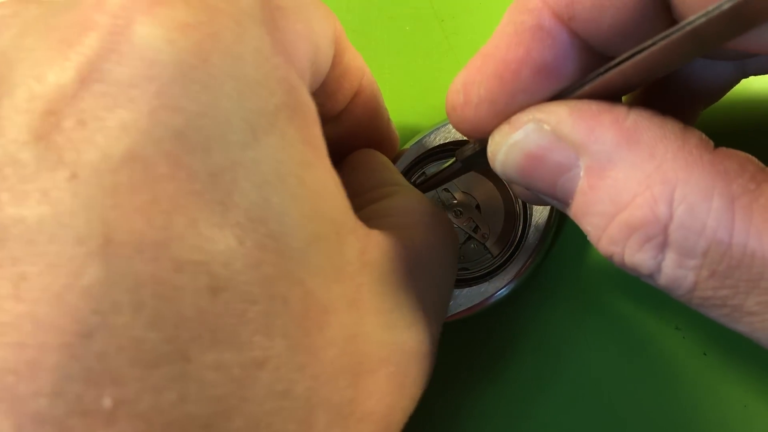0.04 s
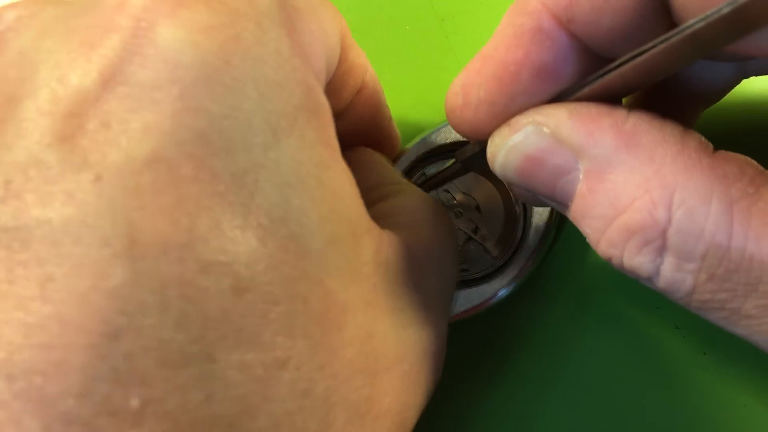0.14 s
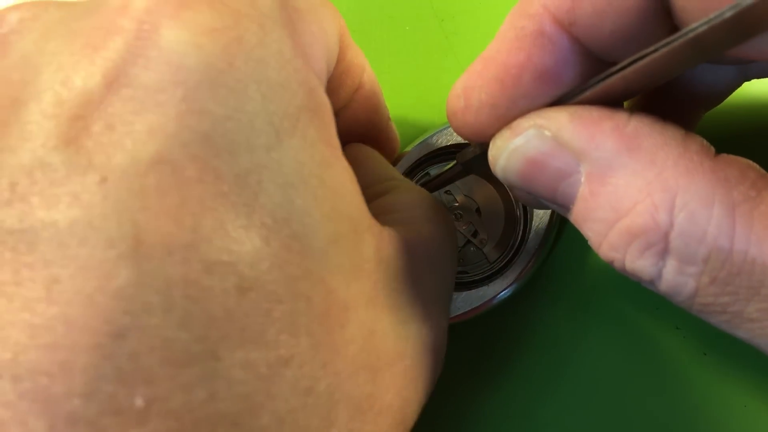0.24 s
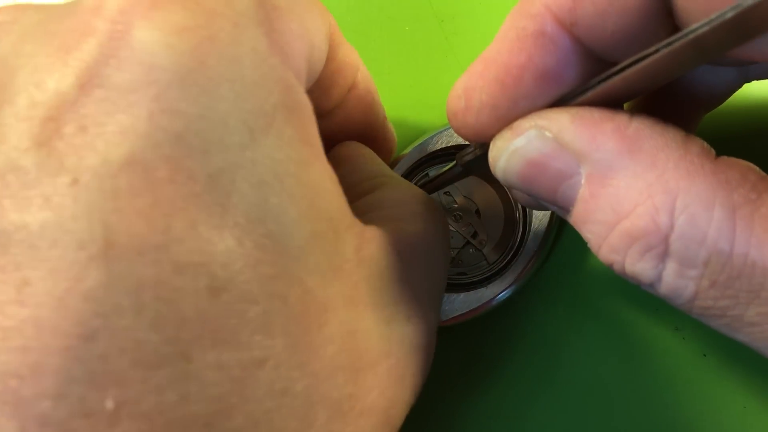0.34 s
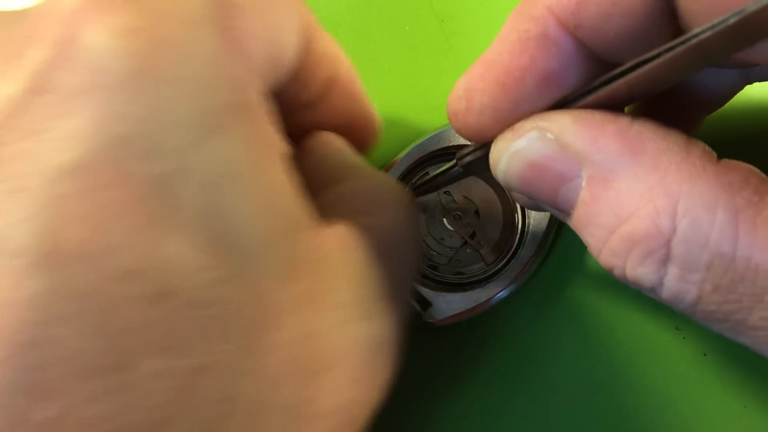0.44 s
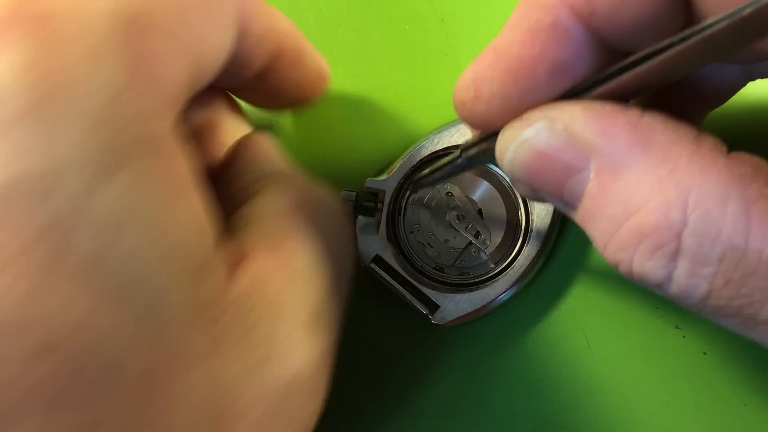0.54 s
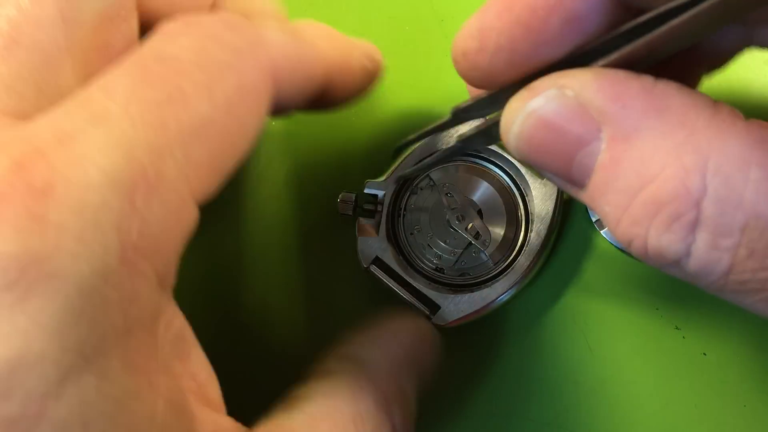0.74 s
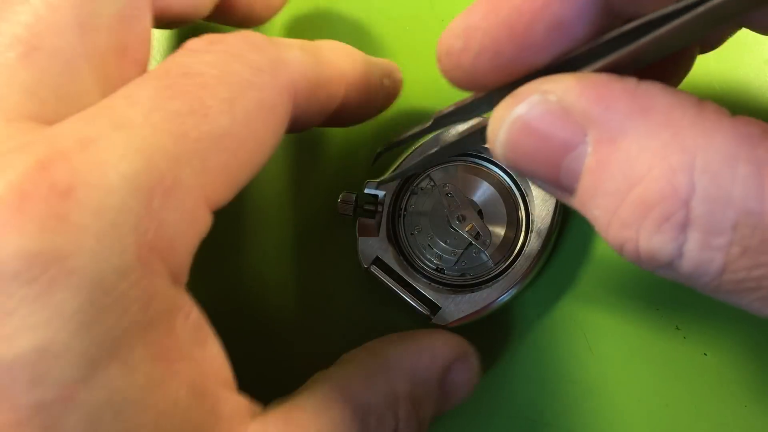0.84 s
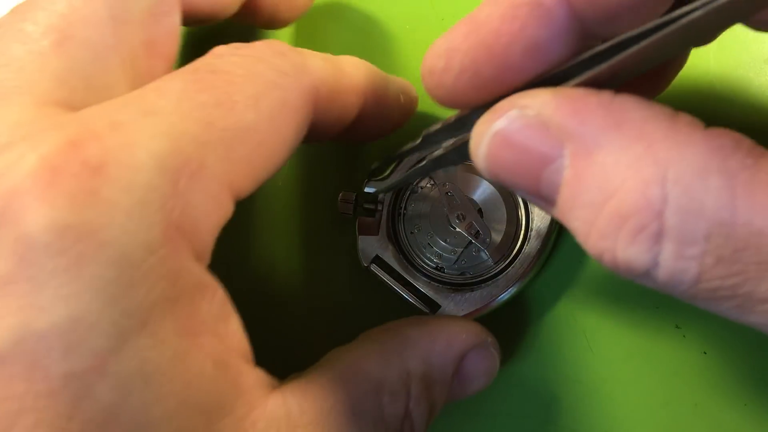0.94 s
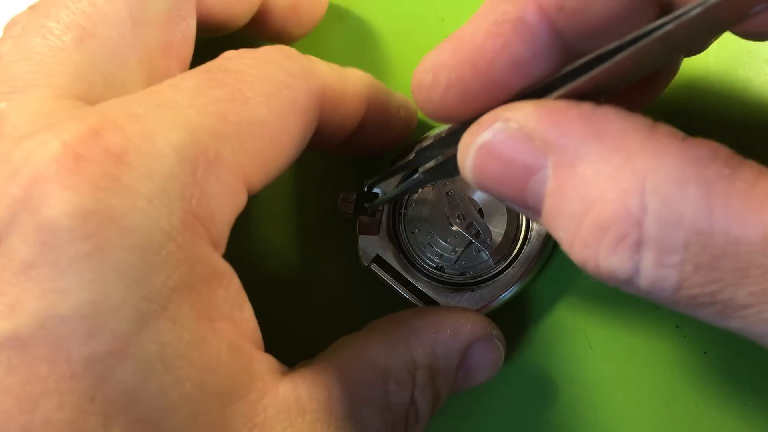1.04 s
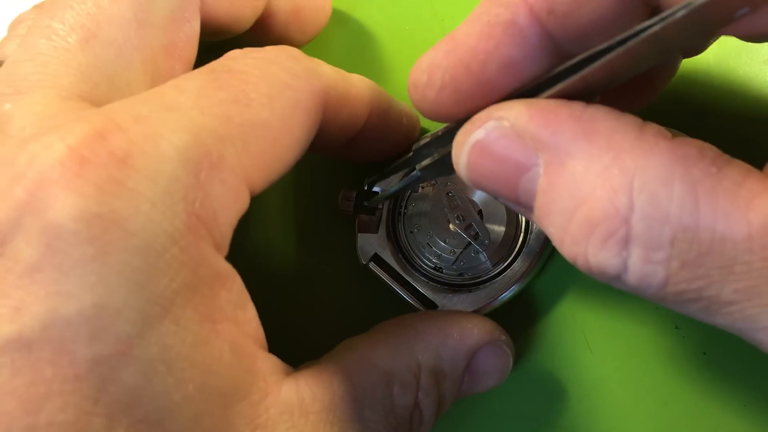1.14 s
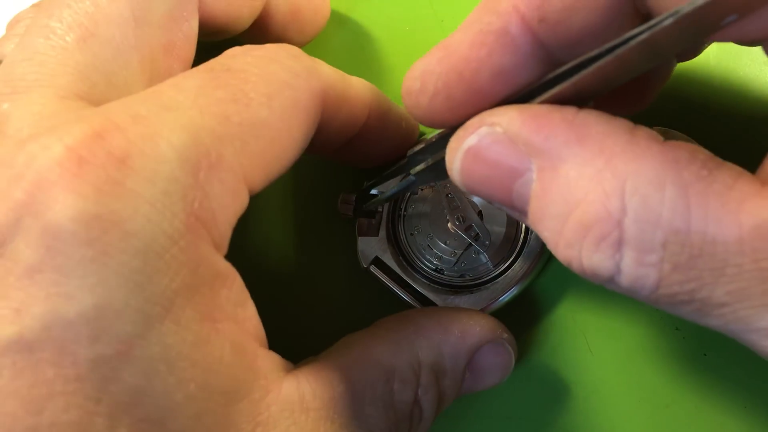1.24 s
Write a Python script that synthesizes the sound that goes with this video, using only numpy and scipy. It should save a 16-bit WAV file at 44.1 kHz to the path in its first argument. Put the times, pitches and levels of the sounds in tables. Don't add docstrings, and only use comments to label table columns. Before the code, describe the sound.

Steel tweezers snap sharply on a metal watch case, which knocks and settles, then a softer tap

```python
import sys
import numpy as np
from scipy import signal
from scipy.io import wavfile
from scipy.ndimage import uniform_filter1d

SR = 44100
rng = np.random.default_rng(int(sys.argv[2]) if len(sys.argv) > 2 else 0)


def ratio_of_db(decibels):
    return 10 ** (np.asarray(decibels, float) / 20)


def pcm_store(signal):
    levels = np.round(np.clip(np.atleast_2d(signal), -1, 1) * 32767)
    wavfile.write(sys.argv[1], SR, levels.astype(np.int16).T)


N = 57330

# start_s, pitch_hz, level_db
RUMBLE_TRACK = [(0.0, 56.5, -76), (0.064, 58.7, -73), (0.136, 60.8, -51.5), (0.234, 55.5, -60),
                (0.282, 62.1, -50), (0.404, 61.7, -62.5), (0.42, 61.1, -86), (0.514, 56.5, -54),
                (0.592, 59.7, -70), (0.648, 57.46, -54), (0.756, 60.1, -63.5), (0.778, 57.1, -77),
                (0.832, 58.2, -49.5), (1.082, 60.16, -65.5), (1.126, 57, -54.5), (1.19, 50.95, -81.5),
                (1.216, 51.6, -54.5), (1.3, 49, -59)]
# freq_hz, density_db
AIR_SPECTRUM = [(12, -78.5), (20, -33), (59, 8.5), (91, -10), (125, -13), (204, -20), (364, -29.5),
                (441, -34.5), (700, -45.5), (910, -65.5), (1540, -120)]
# freq_hz, density_db
CLOSED_HISS_SPECTRUM = [(180, -43), (300, -15.5), (361, -9), (441, -8.5), (717, -18.5), (793, -13),
                        (2570, -19.5), (11400, -31), (16500, -33.5)]
# freq_hz, density_db
OPEN_HISS_SPECTRUM = [(180, -23), (300, 3), (1480, -11.5), (1600, -10.5), (1740, -11.5), (3190, -10.5),
                      (11600, -16), (15400, -16.5), (16500, -33)]
# open_s, close_s, open_level_db, close_level_db
SUPPRESSOR_OPENINGS = [
    (0.23, 0.645, -73, -73),
    (0.653, 0.788, -91, -92),
    (.800, 0.907, -83.5, -85),
    (0.892, .905, -88, -88),
    (1.164, 1.173, -79, -67),
    (1.174, 1.204, -79, -78),
]
# freq_hz, t60_s
ROOM_DECAY = [(150, 0.54), (600, 0.083), (1500, 0.44), (4000, 0.17), (8000, 0.11), (14000, 0.074)]
# freq_hz, level_db, t60_s
CASE_MODES = [(100, -6, .12), (177, -7, .1), (250, -9, .06), (335, -3, .1), (395, -4, .04), (603, -9, .035),
              (735, -4, .04), (810, 0, .04), (970, 0, .03), (1060, -1, .035), (1225, -4, .04),
              (1535, -6, .04), (1925, -10, .03), (2335, -13, .035)]
# start_s, level_db, brightest_hz, ring_share
CASE_KNOCKS = [(.2347, -26.5, 520, 0), (.2383, -25, 1200, 0.55), (.2401, -12.5, 950, 0.52),
               (.2404, -19.5, 2340, 0.65), (.2410, -27.5, 384, 0.67), (.2500, -24.5, 1010, 0.9),
               (.2560, -35, 149, 1.), (.2716, -31, 312.3, 1.), (.2746, -30.5, 1000, 0.8),
               (.2850, -45.5, 171, 1.), (.3240, -51.5, 314, 1), (.4047, -45.5, 362, .8),
               (.4052, -42.5, 1130, 0.47), (.4790, -50.5, 218, 0.9), (.4997, -45, 416.4, 0.3),
               (.5003, -42, 980, 0.35), (.5110, -49, 220, 0.52), (.5340, -55, 200, 0.8),
               (.5730, -49, 453, 0.4), (.5832, -47, 650, 0.38), (.6095, -50, 421, 0.56),
               (1.1771, -27, 700, 0.26), (1.1815, -43.5, 902, 0.73), (1.1900, -41, 790, 0.54)]
# freq_hz, level_db, t60_s
STEEL_MODES = [(3850, -12, .02), (4800, -13, .02), (5717, -17, .035), (6455, -17, .015), (7171, -14, .025),
               (7505, 0, .028), (7540, -12, .075), (8300, -3, .024), (8685, -1, .023), (8950, -9, .022),
               (9200, -10, .022), (9800, -14, .03), (10900, -18, .02), (12300, -19, .04)]
# start_s, level_db, brightest_hz, ring_share
TWEEZER_TICKS = [(.2161, -65, 10000, .2), (.2187, -54, 8200, .4), (.2294, -59, 8000, .4),
                 (.2345, -52, 12000, .3), (.2373, -19, 9600, .3), (.2399, -11.5, 8100, 1.),
                 (.2376, -36, 4200, .8), (.2401, -28, 4000, 1.), (.2491, -32, 8400, .3),
                 (.2737, -38, 5500, .2), (.2742, -47, 12300, .4), (.4065, -56, 5000, .2),
                 (.5000, -64, 11000, .2), (.5205, -64, 9000, .2), (.6215, -47, 8500, .25),
                 (.6945, -68, 13000, .2), (.7245, -68, 5500, .2), (.8210, -70, 14000, .2),
                 (.8912, -62, 10000, .4), (.7610, -70, 9700, 1.4), (1.1652, -63, 8000, .3),
                 (1.1656, -60, 13000, .3), (1.1662, -64, 4800, .5), (1.1760, -58, 12500, .3),
                 (1.1764, -50, 4800, .3), (1.1775, -56, 7500, .4), (1.1910, -59, 4600, .8),
                 (1.1960, -65, 8500, .3)]


def evened(x):
    return x / np.sqrt(np.mean(x ** 2) + 1e-20)


def read(points, hz):
    f, value = np.transpose(points)
    return np.interp(np.log(hz + 1), np.log(f + 1), value)


def add(mix, start_s, sound):
    part = mix[round(start_s * SR):][:len(sound)]
    part += sound[:len(part)]


def noise(spectrum, lo_hz, patch_db, size=512):
    hop, hz = size // 4, np.fft.rfftfreq(size, 1 / SR)
    real, imag, patch = rng.standard_normal((N // hop + 5, len(hz), 3)).T
    patch = uniform_filter1d(patch, size=6, axis=0)
    patch = evened(uniform_filter1d(patch, size=12, axis=1))
    gain = ratio_of_db(read(spectrum, hz)[:, None] + patch_db * patch)
    x = signal.istft((real + 1j * imag) * gain, nperseg=size, noverlap=size - hop)[1][:N]
    high_pass = signal.butter(4, lo_hz, "high", fs=SR, output="sos")
    above = signal.sosfilt(high_pass, x)
    return x / np.sqrt(np.mean(above ** 2))


def rumble():
    start_s, pitch_hz, level_db = np.transpose(RUMBLE_TRACK)
    t = np.arange(N) / SR

    def glide(values):
        return uniform_filter1d(np.interp(t, start_s, values), size=900)

    phase = 2 * np.pi * np.cumsum(glide(pitch_hz)) / SR
    tone = np.sqrt(2) * ratio_of_db(glide(level_db)) * np.sin(phase)
    air = [(hz, db - 12 * np.exp(-(np.log2(hz / 59) / 0.12) ** 2)) for hz, db in AIR_SPECTRUM]
    air += [(1400, -96)]
    return tone + ratio_of_db(-66) * noise(air, lo_hz=86, patch_db=1.5, size=4096)


def hiss():
    edge_s, rustle_db, patch_db = .002, 1.5, 1.2
    low_cut = [(100, -54.5)]
    t, gate = np.arange(N) / SR, np.zeros(N)
    for open_s, close_s, open_db, close_db in SUPPRESSOR_OPENINGS:
        edge = np.clip(np.minimum(t - open_s, close_s - t) / edge_s + .5, 0, 1)
        gate += edge * ratio_of_db(np.interp(t, [open_s, close_s], [open_db, close_db]))
    flutter = evened(uniform_filter1d(rng.standard_normal(N), size=300))
    closed = noise(low_cut + CLOSED_HISS_SPECTRUM, lo_hz=700, patch_db=patch_db)
    opened = noise(low_cut + OPEN_HISS_SPECTRUM, lo_hz=700, patch_db=patch_db)
    return ratio_of_db(-75.5) * closed + 2 * gate * ratio_of_db(rustle_db * flutter) * opened


def room(x):
    delay_s, level_db = .005, -17
    taps = np.zeros(SR // 2)
    at = np.arange(round(delay_s * SR), SR // 2 - 20, 12)
    taps[at + rng.integers(0, 12, len(at))] = rng.choice([-1., 1.], len(at))
    hz, t, z = signal.stft(taps, SR, nperseg=256)
    decay = ratio_of_db(-60 * t / read(ROOM_DECAY, hz)[:, None])
    tail = signal.istft(z * decay, SR, nperseg=256)[1]
    return ratio_of_db(level_db) * signal.fftconvolve(x, tail / np.linalg.norm(tail))[:N]


def hits(rows, modes, reach_octaves, crack_db, rise_s, haze_db, haze_spread, haze_longer):
    detune, scatter_db, crack_s = .002, 1.5, .0008
    out = np.zeros(N)
    hz, mode_db, t60_s = np.transpose(modes)
    side, turn = rng.uniform(-1, 1, (2, 3, len(hz)))
    for start_s, level_db, top_hz, ring in rows:
        tune, size = rng.standard_normal((2, len(hz)))
        ring = np.clip(ring, .05, 1.5)
        t = np.arange(512 + round(.2 * ring * SR)) / SR
        col = t[:, None]

        distance = np.log2(hz / top_hz) / reach_octaves
        gain = ratio_of_db(mode_db + scatter_db * size - 6 * distance ** 2)
        waves = ratio_of_db(-60 * col / (t60_s * ring)) * np.sin(2 * np.pi * hz * (1 + detune * tune) * col)
        near = sum(np.sin(2 * np.pi * hz * (1 + haze_spread * a) * col + np.pi * b)
                   for a, b in zip(side, turn))
        waves += ratio_of_db(haze_db - 60 * col / (t60_s * ring * haze_longer)) * near
        sound = waves @ (gain / np.linalg.norm(gain))

        band = signal.butter(2, [top_hz / 1.7, min(top_hz * 1.4, 15000)], "band", fs=SR)
        crack = evened(signal.lfilter(*band, rng.standard_normal(512)))
        sound[:512] += ratio_of_db(crack_db) / ring * crack * np.exp(-t[:512] / crack_s)

        sound *= 1 - np.exp(-t / rise_s)
        sound *= np.cos(t / t[-1] * np.pi / 2)
        low_cut = signal.butter(1, top_hz / 2, "high", fs=SR)
        add(out, start_s, ratio_of_db(level_db) * signal.lfilter(*low_cut, sound))
    return out


def case_knocks():
    return hits(CASE_KNOCKS, CASE_MODES, reach_octaves=.9, crack_db=-20, rise_s=.0009,
                haze_db=-12, haze_spread=.12, haze_longer=1.8)


def tweezer_ticks():
    return hits(TWEEZER_TICKS, STEEL_MODES, reach_octaves=.55, crack_db=-14, rise_s=.00008,
                haze_db=-20, haze_spread=.03, haze_longer=3.)


def scene():
    near = tweezer_ticks() + case_knocks()
    return (near + room(near) + rumble() + hiss())[None]


def top_cut(x):
    return signal.sosfilt(signal.butter(12, 16690, fs=SR, output="sos"), x)


def record(dry):
    low_edge_hz, high_edge_hz = 36, 16450
    high_pass = signal.butter(2, low_edge_hz, "high", fs=SR, output="sos")
    low_pass = signal.firwin(301, high_edge_hz, window=("kaiser", 9), fs=SR)
    mix = signal.oaconvolve(signal.sosfilt(high_pass, dry), low_pass[None], "same")
    return top_cut(mix)


dry = scene()
out = record(dry)
pcm_store(out)
```